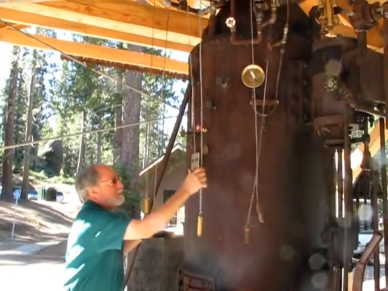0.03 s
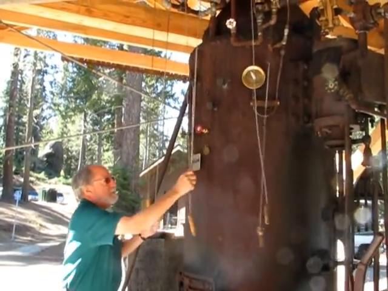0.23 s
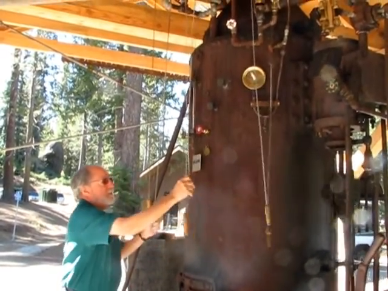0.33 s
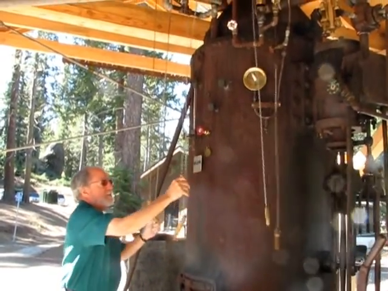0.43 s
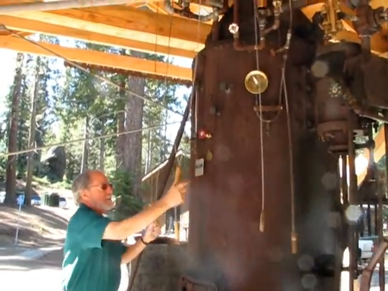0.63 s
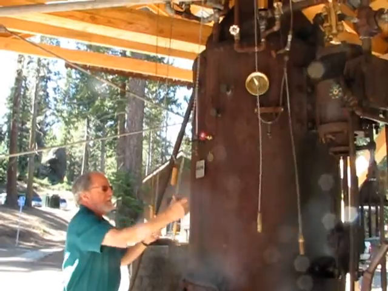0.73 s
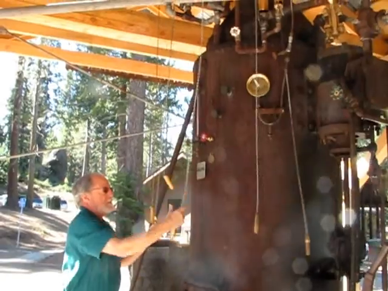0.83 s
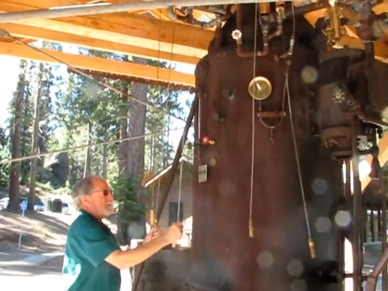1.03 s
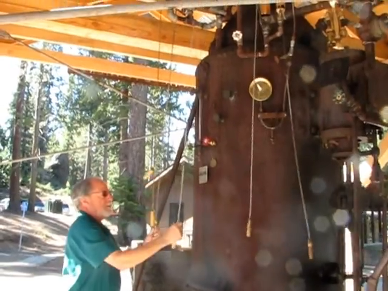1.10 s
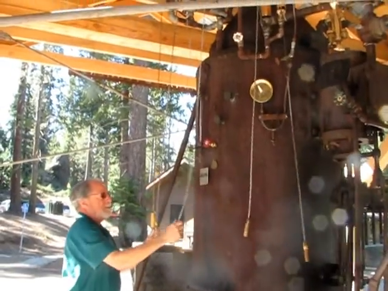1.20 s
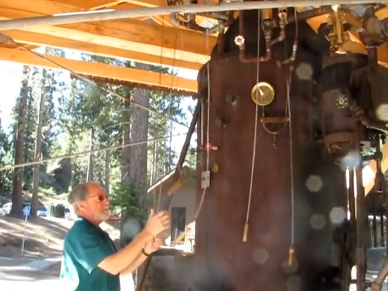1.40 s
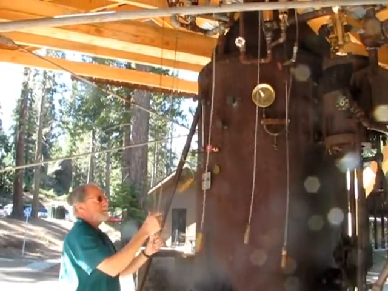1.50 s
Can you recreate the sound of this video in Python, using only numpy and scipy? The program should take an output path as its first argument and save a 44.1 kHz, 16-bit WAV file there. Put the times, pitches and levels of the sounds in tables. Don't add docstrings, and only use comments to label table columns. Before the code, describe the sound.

A steam whistle gives a loud breathy chord, stops abruptly and echoes off roof and forest; after faint clanking a second, quieter single-pitch hoot follows. Close, dull, low-grade microphone, distorted on the first blast.

```python
import sys
import numpy as np
from scipy import signal
from scipy.fft import rfft, irfft
from scipy.io import wavfile
from scipy.ndimage import uniform_filter1d

SR = 44100
rng = np.random.default_rng(int(sys.argv[2]) if len(sys.argv) > 2 else 0)


def put_to_file(sound):
    columns = np.atleast_2d(sound).T
    safe = np.clip(columns, -1, 1)
    whole_steps = np.round(safe * 32767)
    wavfile.write(sys.argv[1], SR, whole_steps.astype(np.int16))


def linear_from_db(decibels):
    return 10 ** (np.asarray(decibels, float) / 20)


N = 68355
T = np.arange(N) / SR


def white():
    return rng.standard_normal(N)


def evened(x):
    return x / np.sqrt(np.mean(x ** 2) + 1e-20)


def coloured(x, points):
    hz = np.fft.rfftfreq(len(x), 1 / SR)
    table_hz, table_db = np.transpose(points)
    gain_db = np.interp(np.log(hz + 1), np.log(table_hz + 1), table_db)
    return irfft(rfft(x) * linear_from_db(gain_db), len(x))


def resonate(x, hz, width_hz):
    turn = np.exp(2j * np.pi * np.cumsum(hz * np.ones(len(x))) / SR)
    r = np.exp(-np.pi * width_hz / SR)
    return 2 * (turn * signal.lfilter([1 - r], [1, -r], x / turn)).real


def drift(size):
    return evened(uniform_filter1d(uniform_filter1d(white(), size), size))


def valve(opens_s, shuts_s, rise_s, fall_s):
    opening = 1 - np.exp(-np.maximum(T - opens_s, 0) / rise_s)
    return opening * np.exp(-(np.maximum(T - shuts_s, 0) / fall_s) ** 1.3)


# (frequency [Hz], density [dB per Hz])
AIR_SPECTRUM = [(18, -25), (30, -20.5), (417, -17.5), (784, -11), (1050, -29), (2470, -20.5), (2640, -23),
                (5310, -26), (6500, -62), (8450, -71.5), (14300, -120)]


def open_air():
    level_db = -47 + 2.8 * drift(size=2000)
    return linear_from_db(level_db) * evened(coloured(white(), AIR_SPECTRUM))


# (start [s], length [s], pitch [Hz], level [dB])
RINGS = [(.01, 0.12, 619.6, -42.5), (0.028, 0.073, 294, -38.5), (0.024, .06, 1077, -44.5),
         (0.145, 0.032, 308, -31.5), (0.144, .11, 794, -40.5), (0.166, 0.11, 657.4, -30),
         (0.226, 0.022, 1248, -31.5), (0.258, 0.036, 1207, -36.5), (0.241, 0.027, 494, -27.5),
         (0.272, 0.063, 425, -31.5), (0.273, .04, 298.2, -30), (0.267, 0.064, 168, -38),
         (0.851, 0.058, 167, -44), (0.906, 0.11, 191, -50.5), (0.978, 0.11, 1236, -41.5),
         (0.987, 0.03, 631, -40.5), (1.004, 0.039, 298, -46.5), (1.036, 0.039, 175.5, -41.5)]


def rings(knocks):
    out = np.zeros(N)
    for start_s, length_s, hz, db in RINGS:
        phase = np.clip((T - start_s) / length_s, 0, 1)
        swell = np.sin(np.pi * phase ** 0.9) ** 0.46 * (T < start_s + length_s)
        ring = evened(swell * resonate(knocks, hz, width_hz=6.7))
        out += linear_from_db(db) * ring * np.sqrt(length_s * SR / N)
    return out


# (time [s], level [dB])
RATTLE_LEVEL = [(0, -40), (.04, -31), (.14, -31.5), (.2, -25), (.25, -28), (.32, -24), (.345, -33),
                (.6, -27), (.64, -49), (.84, -46), (.856, -38), (.99, -36), (1.045, -25.5), (1.07, -47),
                (1.4, -50.5), (1.43, -43), (1.52, -43.5), (1.55, -29.5)]
# (frequency [Hz], width [Hz], level [dB])
PIPE_MODES = [(169.4, 70, 0), (318.8, 17, -5), (425, 110, 0), (487, 100, 1.5), (621.8, 17, 0),
              (796, 90, -10), (1084, 40, -5.5), (1214, 43, -10), (1536, 96, -17), (2250, 200, -27.5),
              (4296, 180, -16.5)]
# (frequency [Hz], density [dB per Hz])
BODY_SPECTRUM = [(18, -56), (30, -16), (291, -7.5), (559, -15), (640, -7.5), (733, -14.5), (1230, -13.5),
                 (4340, -34.5), (6500, -50), (8450, -78.5), (14300, -120)]


def rattle():
    knocks_per_s, knock_spread_db, pipe_db, body_db = 500, 3, -6, -3.5
    struck = rng.random(N) < knocks_per_s / SR
    size = linear_from_db(knock_spread_db * np.minimum(rng.exponential(1, N), 4)) * struck
    knocks = evened(size * rng.choice([-1., 1.], N)) + 0.57 * white()
    pipe = np.zeros(N)
    for hz, width_hz, db in PIPE_MODES:
        mode = resonate(resonate(knocks, hz, width_hz), hz, 3 * width_hz)
        pipe += linear_from_db(db + 5.7 * drift(size=1500)) * evened(mode)
    body = evened(coloured(knocks + 1.1 * white(), BODY_SPECTRUM))
    level = linear_from_db(np.interp(T, *np.transpose(RATTLE_LEVEL)))
    return level * (linear_from_db(pipe_db) * evened(pipe) + linear_from_db(body_db) * body) + rings(0.49 * knocks + white())


# (time [s], level [dB], fade [s])
CHIFFS = [
    (0.327, -21, 0.015),
    (1.055, -37, 0.0079),
]


def chiffs():
    out = np.zeros(N)
    for s, db, fade_s in CHIFFS:
        out += linear_from_db(db) * valve(s, s + 0.0048, 0.0014, fade_s)
    return out * evened(np.diff(rng.standard_normal(N + 1)))


# (time [s], pitch [Hz], level [dB], t60 [s])
CATCHES = [
    (.326, 2615, -20.5, 0.047),
    (.327, 513, -25, .03),
    (.335, 1183, -9, .04),
    (.340, 2174, -19.5, 0.067),
    (.612, 1580, -14, .13),
    (0.847, 1105, -33.5, .12),
    (1.056, 2120, -45, 0.073),
    (1.531, 1307, -35.5, 0.12),
]


def catches():
    out = np.zeros(N)
    for s, hz, db, t60_s in CATCHES:
        t = np.maximum(T - s, 0)
        attack = np.minimum(t / 0.0039, 1)
        out += linear_from_db(db - 60 * t / t60_s) * attack * np.sin(2 * np.pi * hz * t)
    return out


# (opens [s], shuts [s], level [dB])
JETS = [
    (0.337, 0.601, -22),
    (1.05, 1.234, -32.5),
]
# (frequency [Hz], density [dB per Hz])
JET_SPECTRUM = [(59, -70), (100, -44.5), (564, -21), (626, -17.5), (720, -13.5), (785, -15), (1000, -24),
                (1780, -21), (6500, -39), (8450, -87.5), (14300, -120)]


def jets():
    hiss = evened(coloured(white(), JET_SPECTRUM)) * linear_from_db(1.5 * drift(size=150))
    edge_tone = evened(resonate(white(), hz=2150, width_hz=72)) * linear_from_db(-34)
    out = np.zeros(N)
    for opens_s, shuts_s, db in JETS:
        steam = valve(opens_s, shuts_s, rise_s=.003, fall_s=0.024)
        out += linear_from_db(db) * steam * hiss
    return out + edge_tone * steam


# (opens [s], shuts [s], pitch [Hz], level [dB], breathiness [dB])
BELLS = [
    (.351, .608, 633.8, -10, -21),
    (.339, .634, 784.5, -21.5, -13),
    (.345, .618, 877.8, -26.5, -20),
    (1.056, 1.229, 810.0, -15, -27),
]
# (level re fundamental [dB], ..)
OVERTONES = [
    (-24.5, -41.5),
    (-4.5, -14, -24, -38.5),
    (1, -19),
    (-6, -2.5, -10, -23.5, -48.5, -23, -47),
]
# (fall [s], pitch droop [share])
RELEASES = [
    (0.021, 0.014),
    (.02, .03),
    (0.021, 0.024),
    (0.029, 0.11),
]


def bell(opens_s, shuts_s, hz, db, breath_db, overtones, fall_s, droop):
    rise_s, bloom_s, settle_s, droop_s = .003, .009, 0.022, 0.024
    flat, wander, flutter = .012, .0012, 0.033
    breath_width_hz, breath_db_per_overtone, twist_rad = 30, 2.2, 0.22
    since_open = np.maximum(T - opens_s, 0)
    unsettled = np.exp(-since_open / settle_s) + 6 * np.exp(-since_open / rise_s)
    closing = 1 - np.exp(-np.maximum(T - shuts_s, 0) / droop_s)
    unsteady = wander * drift(size=700) + flutter * closing * drift(size=200)
    pitch_hz = hz * (1 - flat * unsettled - droop * closing + unsteady)
    phase = 2 * np.pi * np.cumsum(pitch_hz) / SR
    out = np.zeros(N)
    for k, part_db in enumerate((0, *overtones), 1):
        breath = evened(resonate(white(), k * pitch_hz, breath_width_hz * k ** .7))
        breath *= linear_from_db(breath_db + breath_db_per_overtone * (k - 0.5))
        tone = np.sqrt(2) * np.sin(k * phase + twist_rad * k * k) * linear_from_db(0.69 * drift(size=500))
        part_fall_s = fall_s / (1 + 1.2 * (1 - k % 2))
        steam = valve(opens_s, shuts_s, rise_s + bloom_s * (k - 1), part_fall_s)
        out += linear_from_db(part_db) * steam * (tone + breath)
    return linear_from_db(db) * out


def whistles():
    return sum(bell(*row, parts, *end) for row, parts, end in zip(BELLS, OVERTONES, RELEASES))


# (delay [s], level [dB])
ROOF = [(.006, -28.5), (.017, -7), (.026, -19), (.037, -13), (.052, -14.5)]
# (frequency [Hz], gain [dB])
REFLECTED_COLOUR = [(300, -31.5), (800, 3), (1150, -0.5), (1650, -12), (2400, -1), (3100, -12.5),
                    (6000, -13)]


def space(x):
    shed_db, shed_t60_s, trees_db, trees_t60_s = -9, 0.23, -17, 2.1
    taps = np.zeros((2, N))
    at = np.arange(400, N - 20, 20) + rng.integers(0, 20, (2, (N - 401) // 20))
    np.put_along_axis(taps, at, rng.choice([-1., 1.], at.shape), 1)
    shed = taps[0] * linear_from_db(-60 * T / shed_t60_s)
    trees = taps[1] * linear_from_db(-60 * T / trees_t60_s) * np.minimum(T / 0.14, 1)
    room = linear_from_db(shed_db) * shed / np.linalg.norm(shed)
    room += linear_from_db(trees_db) * trees / np.linalg.norm(trees)
    for k, (delay_s, db) in enumerate(ROOF):
        room[round(delay_s * SR)] += linear_from_db(db) * (-1) ** k
    return x + coloured(signal.fftconvolve(x, room)[:N], REFLECTED_COLOUR)


def scene():
    background = open_air() + rattle()
    blasts = chiffs() + catches() + jets() + whistles()
    return (background + space(blasts))[None]


def limited(x):
    threshold_db, share, lag_s = -13, .5, .008
    keep = np.exp(-1 / (lag_s * SR))
    power_db = 10 * np.log10(signal.lfilter([1 - keep], [1, -keep], x ** 2) + 1e-12)
    return x / linear_from_db(share * np.maximum(power_db - threshold_db, 0))


def low_rate(x):
    output_hz, half_width_hz = 5603, 615
    sampled = 4 * x * (np.arange(N) % 4 == 0)
    above_hz = np.fft.rfftfreq(N, 1 / SR) - output_hz + 2 * half_width_hz
    over = np.maximum(above_hz, 0) / (2 * half_width_hz)
    return irfft(rfft(sampled) * linear_from_db(np.maximum(-6.0 * over ** 2.57, -90)), N)


def top_cut(x):
    return signal.sosfilt(signal.butter(12, 7060, fs=SR, output="sos"), x)


def record(dry):
    ceiling, coupling_hz, input_hz, offset = .4, 25, 6100, -0.012
    held = limited(dry)
    clipped = held / (1 + abs(held / ceiling) ** 8) ** (1 / 8)
    coupled = signal.lfilter(*signal.butter(1, coupling_hz, "high", fs=SR), clipped)
    heard = signal.sosfilt(signal.butter(4, input_hz, fs=SR, output="sos"), coupled) + offset
    return top_cut(low_rate(heard))


dry = scene()
out = record(dry)
put_to_file(out)
```